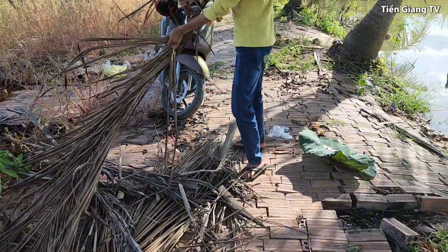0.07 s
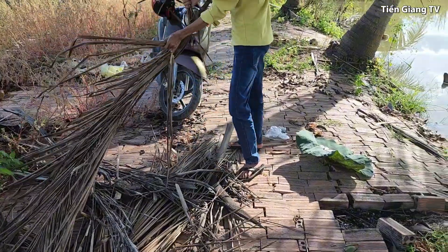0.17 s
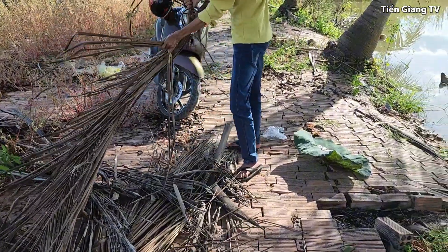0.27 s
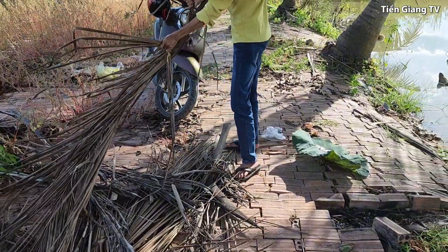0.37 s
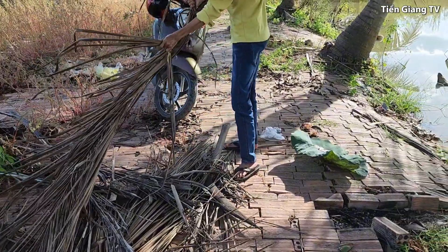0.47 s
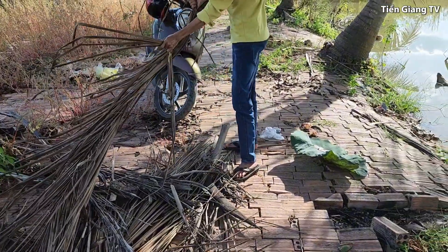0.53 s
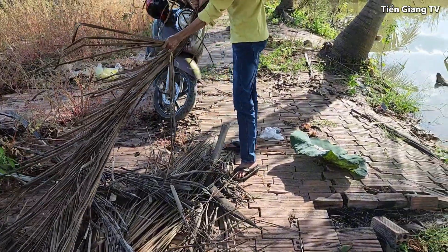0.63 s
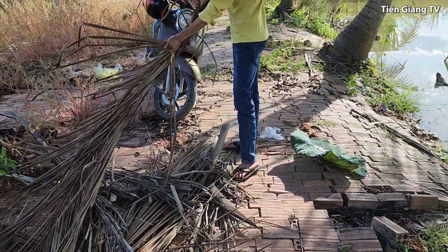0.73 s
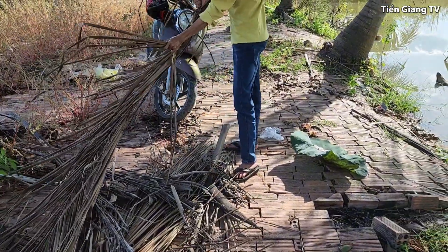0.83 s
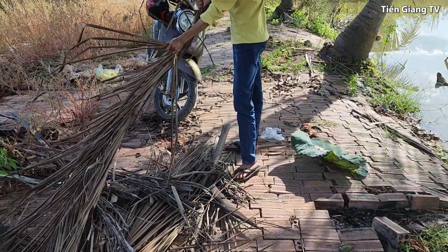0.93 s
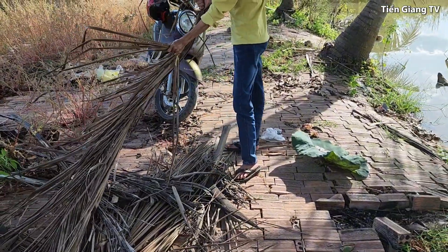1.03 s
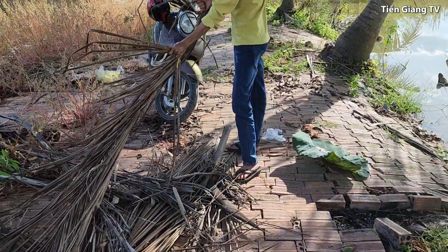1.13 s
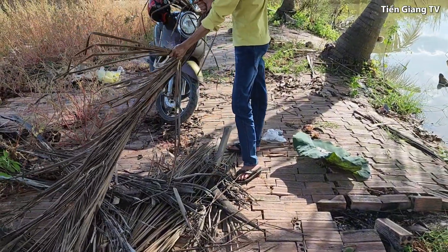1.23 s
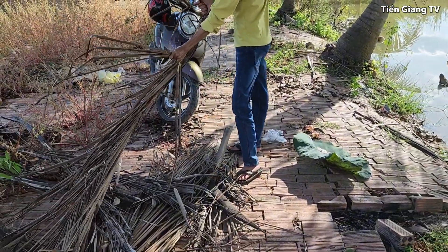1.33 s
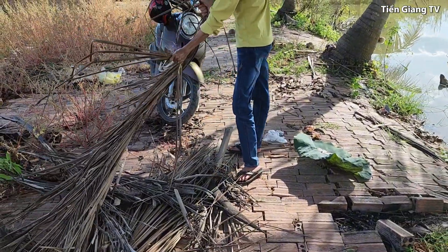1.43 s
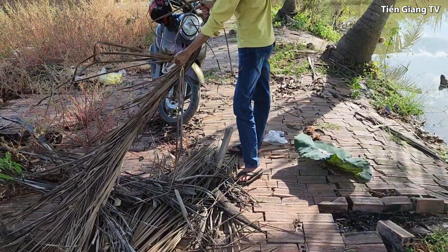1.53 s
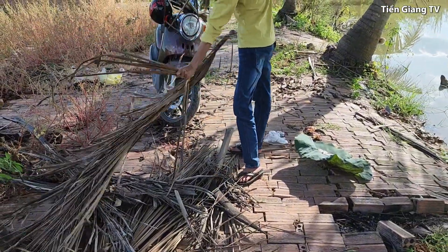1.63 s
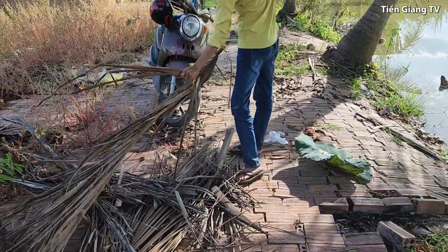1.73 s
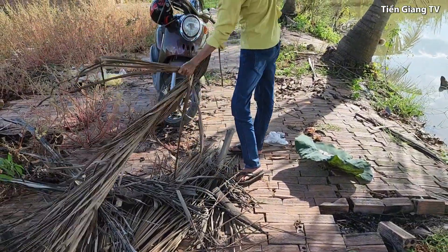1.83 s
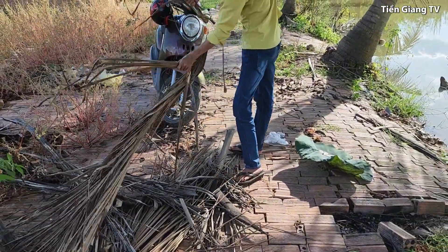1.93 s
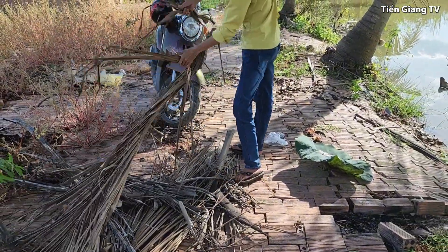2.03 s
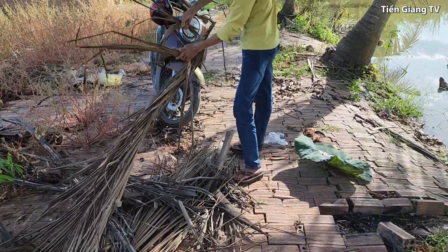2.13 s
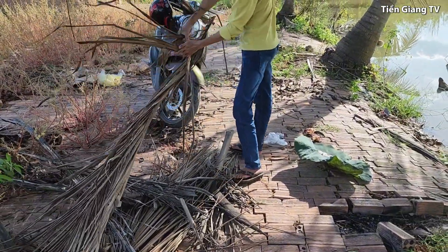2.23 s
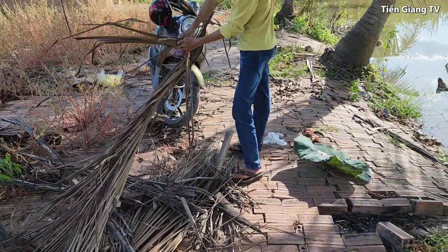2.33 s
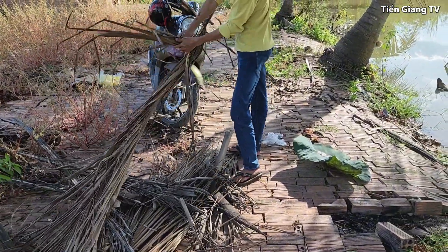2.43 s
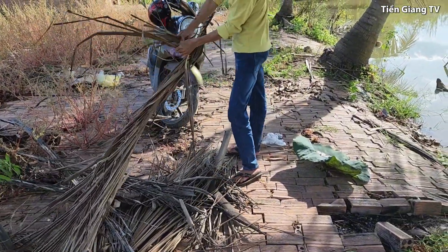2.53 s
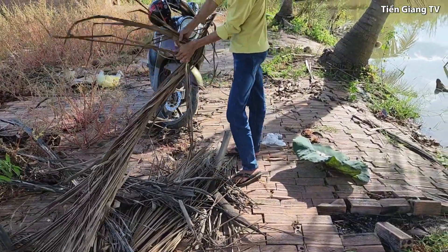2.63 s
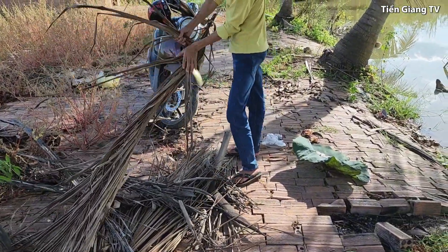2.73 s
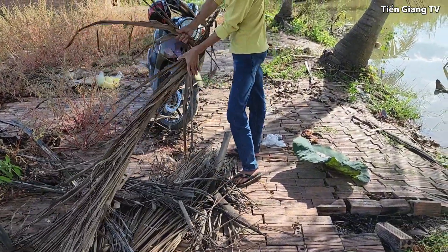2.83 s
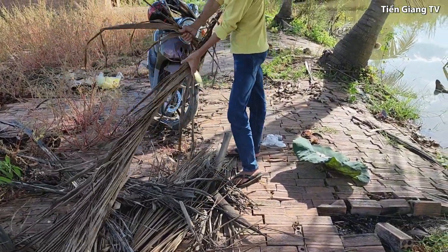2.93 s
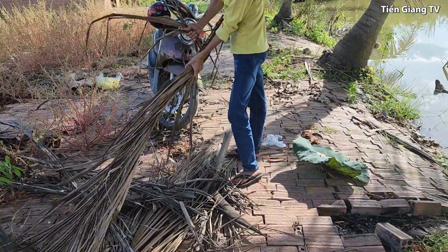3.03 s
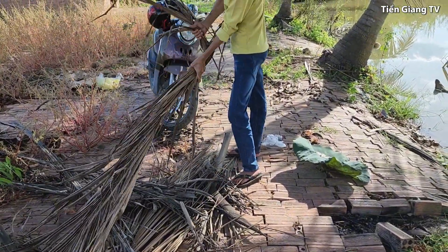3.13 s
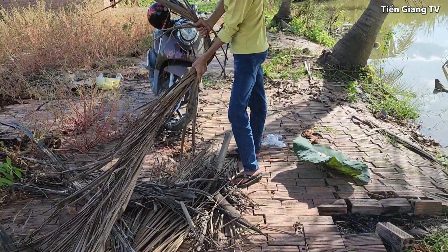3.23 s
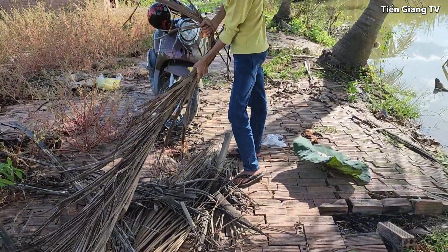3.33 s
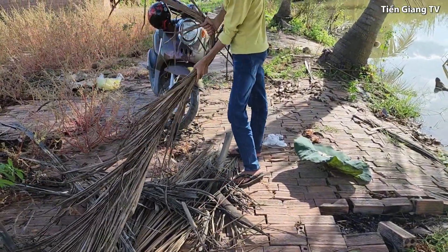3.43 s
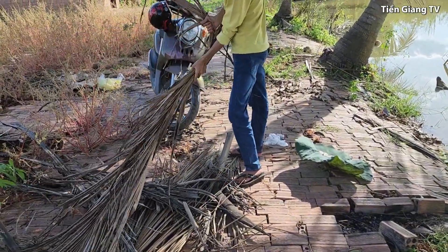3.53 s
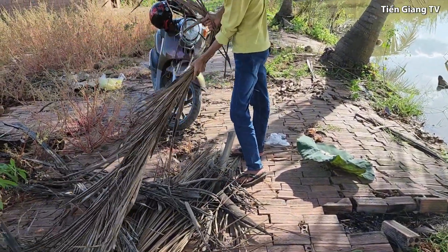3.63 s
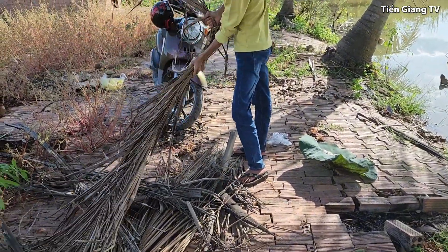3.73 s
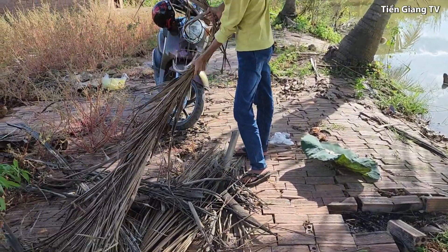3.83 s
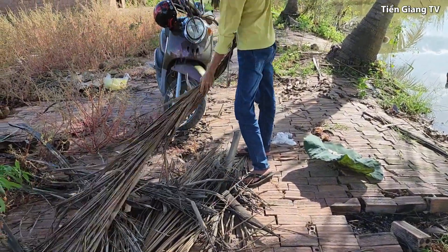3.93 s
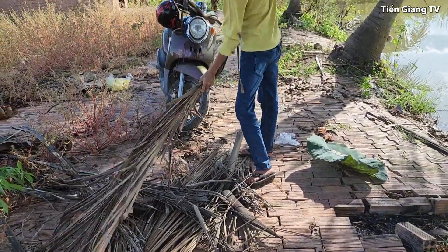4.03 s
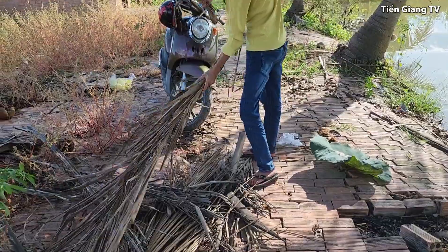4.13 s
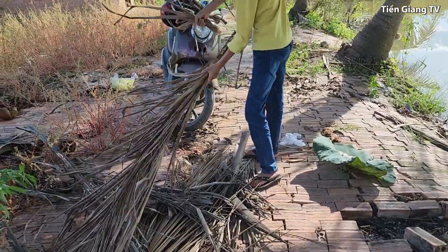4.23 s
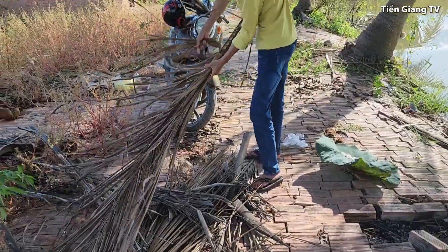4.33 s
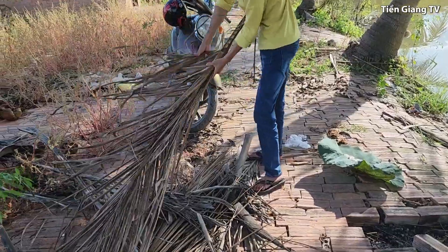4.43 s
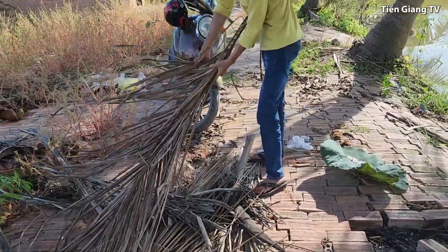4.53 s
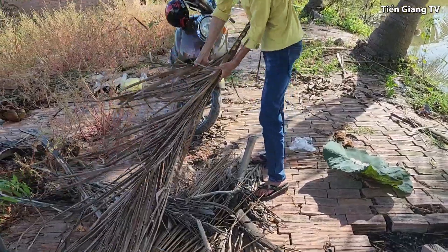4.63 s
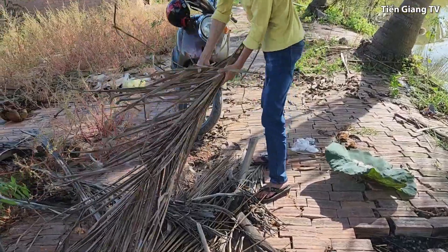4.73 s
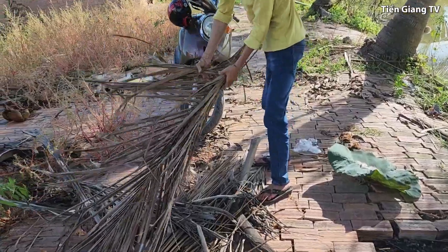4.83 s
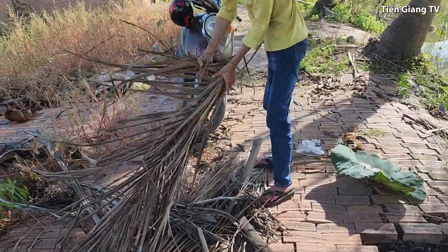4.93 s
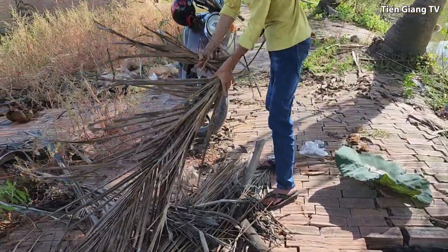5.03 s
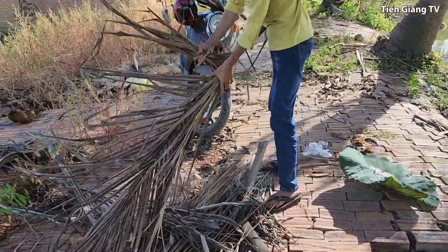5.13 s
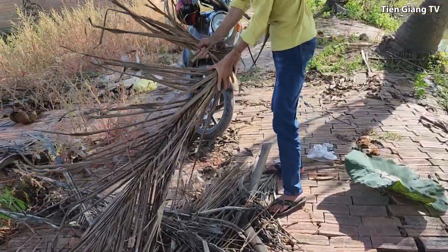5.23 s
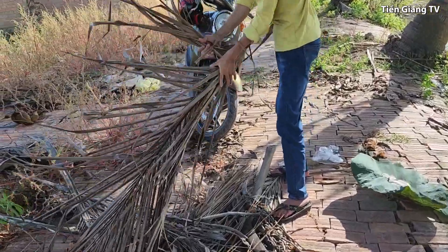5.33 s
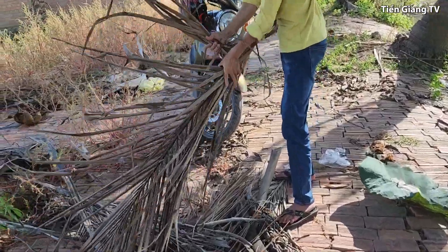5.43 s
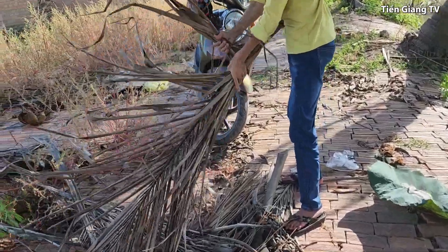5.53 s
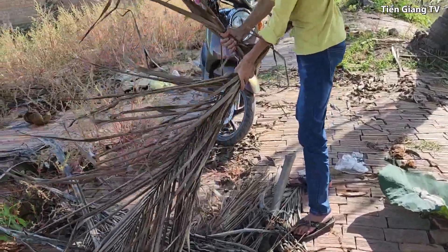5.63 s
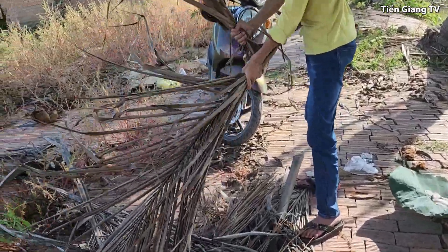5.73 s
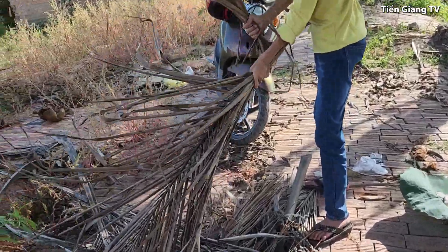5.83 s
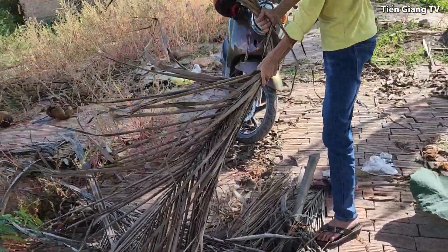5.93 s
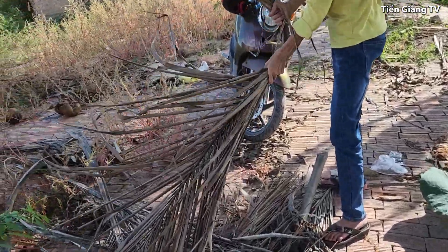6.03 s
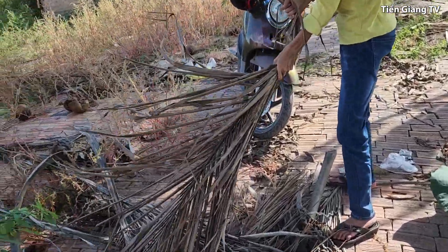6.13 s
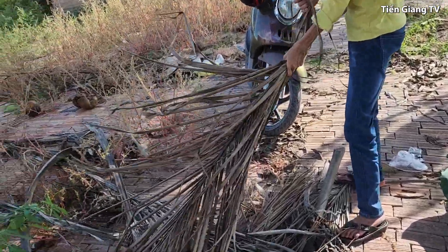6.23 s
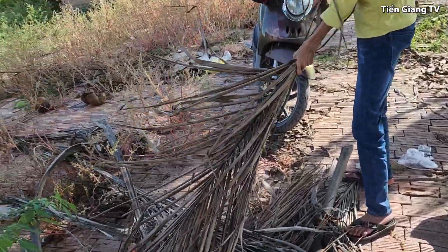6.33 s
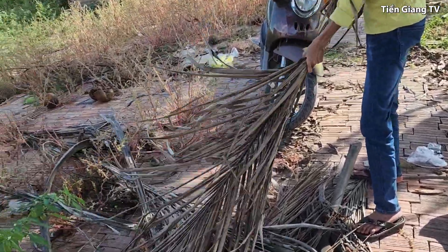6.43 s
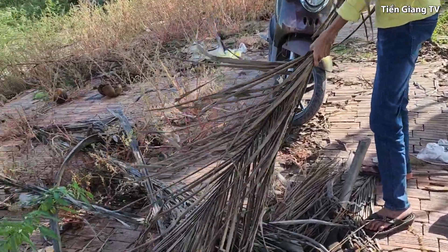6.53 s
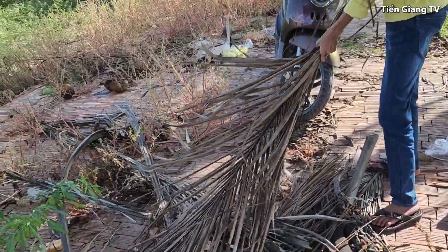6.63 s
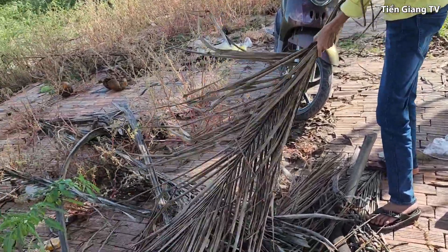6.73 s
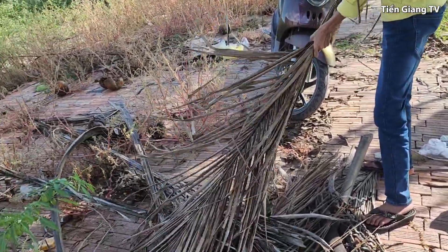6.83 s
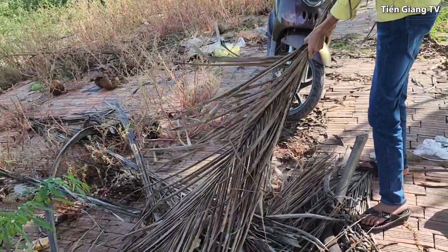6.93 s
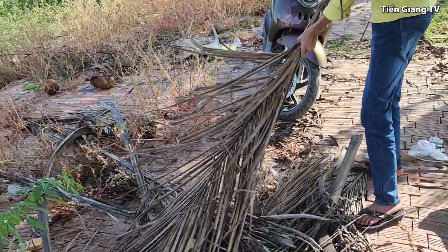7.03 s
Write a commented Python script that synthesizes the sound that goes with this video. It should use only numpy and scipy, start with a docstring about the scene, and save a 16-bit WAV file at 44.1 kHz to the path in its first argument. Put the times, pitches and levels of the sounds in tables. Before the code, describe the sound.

Dry palm fronds rustle and crackle in uneven pulls over a heap on brick, with snapping ribs, hollow taps and one hard late thud.

```python
"""A dry frond rustles and rib snaps crowd the first moments, over a low outdoor rumble and drone.
Fronds are pulled over a heap on a brick path: ringing noise ticks make the rustle, noise bursts the snaps.
Hollow stems tap and heavy stalks thud as damped sine modes; late on, a hard thud leaves the heap rattling.
Two microphones hear the fronds drift from left to right, with a short scattered tail."""
import sys
import numpy as np
from scipy import signal
from scipy.fft import rfft, irfft, next_fast_len
from scipy.io import wavfile
from scipy.ndimage import uniform_filter1d, map_coordinates

SR = 44100
rng = np.random.default_rng(int(sys.argv[2]) if len(sys.argv) > 2 else 0)


def dump(signal):
    """Clip the signal to [-1, 1] and save it as 16-bit WAV at the path in sys.argv[1]."""
    limited = np.clip(np.atleast_2d(signal).T, -1, 1)
    pcm = np.round(limited * 32767).astype(np.int16)
    wavfile.write(sys.argv[1], SR, pcm)


N = 312228  # samples


def amp(db):
    """Decibels to gain."""
    return 10 ** (np.asarray(db) / 20)


def unit(x):
    """Scale to rms 1."""
    return x / np.sqrt(np.mean(x ** 2) + 1e-20)


def along(points, hz):
    """Read (Hz, value) points on a log frequency axis."""
    point_hz, value = np.transpose(points)
    return np.interp(np.log(hz + 1), np.log(point_hz + 1), value)


def curves(rows):
    """One value per sample for each column after the time."""
    time_s, *columns = np.transpose(rows)
    return [np.interp(np.arange(N) / SR, time_s, column) for column in columns]


def wobble(knots_per_s):
    """Random curve: straight lines between normal random knots."""
    knots = rng.standard_normal(int(N * knots_per_s / SR) + 4)
    return np.interp(np.arange(N) * knots_per_s / SR, np.arange(len(knots)), knots)


def filtered(x, gain):
    """Apply a gain that depends on frequency."""
    n = x.shape[-1]
    padded = next_fast_len(n + SR // 20)
    spectrum = rfft(x, padded) * gain(np.fft.rfftfreq(padded, 1 / SR))
    return irfft(spectrum, padded)[..., :n]


def below(hz, edge_hz):
    """Smooth low-pass gain; 1 minus it is the matching high-pass."""
    return 1 / (1 + (hz / edge_hz) ** 4)


def add(track, start_s, sound):
    """Mix a sound into a track."""
    part = track[..., max(round(start_s * SR), 0):][..., :sound.shape[-1]]
    part += sound[..., :part.shape[-1]]


def pair(size, apart):
    """Stereo noise; apart is the share of power the two channels do not have in common."""
    apart = np.clip(apart, 0, 1)
    common = np.sqrt(1 - apart) * rng.standard_normal(size)
    return common + np.sqrt(apart) * rng.standard_normal((2, size))


# Restless held frond. Each row: time in s, leaflet rustle in dB, brightness in dB (tips up, stalk down by half).
STIR = [(0, -42.5, 0), (.25, -44, 6), (.6, -56.5, 1), (.8, -63, 9.5), (1.05, -57, 0), (1.3, -52, 2),
        (1.57, -53, -2), (2.3, -52.5, -2), (2.76, -54.5, -1.5), (3.15, -44, 1), (3.6, -45.5, 0),
        (3.8, -44.5, 0.5), (4.3, -46, -1), (4.7, -43, -6), (5.0, -42.5, -2), (5.15, -46, -0.5),
        (6.1, -43.5, 3.5), (6.3, -49, 1), (7.08, -43, -1)]
STIR_STALK_DB, STIR_TIP_DB = -8.5, -1  # over its leaflet rustle
STIR_CRACKLE = 0.3  # share of power, 0-1
# Pulls on the fronds. Each row: start in s, rise in s, hold in s, die-away t60 in s, leaflet rustle in dB,
# stalk scrape over it in dB, tip fizz over it in dB, crackle share 0-1 (sliding low, bending and tugging high).
PULLS = [(0.05, 0.084, 0.069, 0.18, -36, -22, 0.5, 0.66), (0.3, 0.042, 0.049, 0.32, -43, -11, 4, 0.52),
         (0.535, 0.026, 0.018, 0.61, -51.5, -24, 5, 0.47), (0.655, .04, .04, 0.22, -50.5, -12.5, 1, .45),
         (0.844, 0.013, 0.095, 0.37, -55, -13.5, 4.5, .7), (1.045, 0.03, .02, 0.23, -51.5, -13, 0.5, 0.45),
         (1.583, 0.052, 0.037, 2.3, -34, -8.5, -2.5, 0.05), (2.505, 0.071, .06, 0.24, -47, -14, -2, .45),
         (2.847, 0.084, 0.13, 0.54, -45.5, -8, -6, 0.3), (3.217, .07, 0.17, .6, -36.5, -17.5, -3.5, 0.49),
         (3.833, 0.063, 0.096, 0.88, -32.5, -8.5, -3.5, 0.05),
         (4.407, 0.058, 0.02, 1, -43.5, -6.5, -2, 0.2), (4.781, .045, 0.037, 0.33, -29.5, -9, -5.5, .25),
         (5.175, .06, .015, 0.51, -39.5, -9.5, 0.5, 0.6), (5.321, 0.073, 0.28, 0.64, -39, -10, -8, 0.52),
         (5.55, .075, 0.046, 1.05, -29, -10.5, -5.5, 0.4), (5.759, 0.035, .08, 0.54, -38, -25, -2.5, 0.29),
         (5.912, 0.042, 0.1, .18, -35.5, -10.5, 1, 0.63), (6.14, .012, 0.0084, 0.19, -43, -6, 10, .5),
         (6.239, .008, .015, .25, -42, -10, 3, 0.35), (6.326, 0.047, 0.014, 0.13, -32, -2.5, 5.5, 0.43),
         (6.392, 0.045, .1, 1.3, -40.5, -4, -2, .1), (6.579, 0.012, 0.021, .6, -32, -6.5, -3, 0.06),
         (6.712, 0.034, 0.054, 0.49, -35.5, -4, -3, 0.14), (6.86, 0.078, 0.11, 0.68, -34.5, -9.5, -6, 0.04)]


def effort():
    """Stalk, blade and tip drive and crackle share: each pull rises, holds and dies away over the stir."""
    t = np.arange(N) / SR
    stir_db, bright_db = curves(STIR)
    stalk_stir_db = stir_db + STIR_STALK_DB - bright_db / 2
    tip_stir_db = stir_db + STIR_TIP_DB + bright_db
    power = amp([stalk_stir_db, stir_db, tip_stir_db]) ** 2
    crackling = STIR_CRACKLE * power[1]
    for start_s, rise_s, hold_s, t60_s, db, stalk_db, tip_db, share in PULLS:
        onset = np.clip((t - start_s) / rise_s, 0, 1)
        fading_s = np.maximum(t - start_s - rise_s - hold_s, 0)
        pull = (onset * amp(db - 60 * fading_s / t60_s)) ** 2
        power = power + np.outer(amp([stalk_db, 0, tip_db]) ** 2, pull)
        crackling = crackling + share * pull
    return (*np.sqrt(power), np.clip(crackling / power[1], 0, 1))


def leaflets(ticks_per_s, scatter_db, spurt_db, t60_s, ring_hz, ring_spread, count):
    """Groups of leaflets, each with its own brief ring, tick in spurts as they catch and slip."""
    out, t = np.zeros((2, N)), np.arange(SR // 100) / SR
    loudest_db = 1.25 * np.hypot(scatter_db, spurt_db)  # ticks are capped: none stands far above the rustle
    for place in np.linspace(-1, 1, count):
        size_db = scatter_db * rng.standard_normal(N) + spurt_db * wobble(30)
        slipping = rng.random(N) < ticks_per_s / count / SR
        slips = slipping * amp(np.minimum(size_db, loudest_db))
        energy = np.abs(signal.oaconvolve(slips ** 2, amp(-60 * t / t60_s) ** 2)[:N])
        group_hz = min(ring_hz * np.exp(ring_spread * place), SR * .45)
        ring = signal.iirpeak(group_hz, 2.5, SR)
        grains = pair(N, apart=0.83) * np.sqrt(energy)
        out += 0.67 * grains + signal.lfilter(*ring, grains)
    power = np.abs(uniform_filter1d(np.mean(out ** 2, axis=0), size=SR // 10))  # evened over 0.1 s
    return out / np.sqrt(power + 1e-9)


# Dry leaf spectrum, also colours the snaps. Each row: frequency in Hz, density in dB per Hz.
LEAF_SPECTRUM = [(180, -17.5), (330, -13), (520, -18), (750, -6), (1100, -10.5), (1380, -3.5), (1800, -3),
                 (2250, 1.5), (4300, 3), (6300, 0.5), (8200, -3.5), (11000, -2.5), (15500, -5),
                 (16000, -39)]


def rustle(stalk, blade, tip, share):
    """Dense sliding ticks and sparse crackles sound through stalks, blades and thin tips."""
    slide = leaflets(ticks_per_s=6000, scatter_db=4.5, spurt_db=2.5, t60_s=.004,
                     ring_hz=4000, ring_spread=1.3, count=6)
    crackle = leaflets(ticks_per_s=340, scatter_db=6, spurt_db=3.5, t60_s=.009,
                       ring_hz=4000, ring_spread=1.2, count=8)
    ticks = np.sqrt(1 - share) * slide + np.sqrt(share) * crackle
    leaf = lambda hz: amp(along(LEAF_SPECTRUM, hz))
    low = lambda hz: below(hz, 1670)
    high = lambda hz: 1 - below(hz, 7550)
    stalks = unit(filtered(ticks, lambda hz: leaf(hz) * low(hz)))
    blades = unit(filtered(ticks, lambda hz: leaf(hz) * (1 - low(hz) - high(hz))))
    tips = unit(filtered(ticks, lambda hz: leaf(hz) * high(hz)))
    return amp(1.86) * stalk * stalks + amp(-1.93) * blade * blades + tip * tips


# Drone swell. Each row: time in s, level in dB.
DRONE_LEVEL = [(0.0, -53), (0.12, -58), (1.48, -57), (1.99, -46), (2.06, -48), (3.17, -53.5), (4.42, -49.5),
               (5.79, -60.5), (6.5, -59.5)]
# Rumble spectrum. Each row: frequency in Hz, density in dB per Hz.
RUMBLE_SPECTRUM = [(20, -13), (32, -27), (45, -2), (59, 4), (72, -1.5), (105, -2), (140, -6), (220, -54),
                   (400, -55)]
# Drone spectrum. Each row: frequency in Hz, density in dB per Hz.
DRONE_SPECTRUM = [(60, -33), (110, -3.5), (150, 3.5), (220, 1), (300, -14), (410, -12), (520, -29),
                  (1200, -22), (4000, -45)]
RUMBLE_DB = -54.5


def outdoors():
    """Shaped noise: a steady deep rumble and a low drone that swells, as of far traffic."""
    drone_db, = curves(DRONE_LEVEL)
    rumble = unit(filtered(pair(N, apart=0.019), lambda hz: amp(along(RUMBLE_SPECTRUM, hz))))
    drone = unit(filtered(pair(N, apart=0.14), lambda hz: amp(along(DRONE_SPECTRUM, hz))))
    return amp(RUMBLE_DB) * rumble + amp(drone_db) * drone


STRAY_PER_S = 30  # in pure crackle
STRAY_DB, STRAY_SCATTER_DB = 17.5, 2  # level over the leaflet drive, spread
STRAY_WOODY_DB, STRAY_WOODY_SCATTER_DB = -20, 7


def stray_snaps(blade, share, count):
    """Small ribs give way at random, more often the more the frond crackles, louder the harder the pull."""
    at, chance = rng.random((count, 2)).T
    size, wood = rng.standard_normal((count, 2)).T
    i = (at * N).astype(int)
    level_db = 20 * np.log10(blade[i]) + STRAY_DB + STRAY_SCATTER_DB * size
    woody_db = STRAY_WOODY_DB + STRAY_WOODY_SCATTER_DB * wood
    rows = np.transpose([i / SR, level_db, woody_db])
    return list(rows[chance < STRAY_PER_S * share[i] * N / SR / count])


# Loudest ribs snapping and slapping. Each row: time in s, relative level in dB,
# woodiness in dB (-17 is plain leaf, more lifts the lows).
SNAPS = [(0.0861, -16.5, -21), (0.1173, -20, 4), (0.13, -11.5, -17), (0.1524, -17, -19), (0.183, -11, -32),
         (0.196, -20, -17), (0.223, -17, -14), (0.2467, -19, -50), (0.263, -13.5, -35.5),
         (0.3714, -25, -17), (0.5654, -29, -28), (0.845, -24, -6.5), (0.8594, -29, -18), (1.0957, -25, -50),
         (1.1815, -29.5, -25), (1.3991, -25, -6), (1.5865, -18.5, -16), (2.5697, -23.5, -12),
         (2.6316, -17.5, -34), (2.7537, -22, -27), (3.1143, -19, -26), (3.1452, -19.5, -17),
         (3.2912, -21, -11), (3.3272, -11, -14), (3.3518, -19, -4), (3.3814, -21, -19), (3.447, -19.5, -18),
         (3.5037, -18, -7), (3.8331, -19, -38), (3.868, -24, -5), (4.0162, -18, -13), (4.797, -13.5, -19),
         (4.8275, -10.5, -18), (4.8315, -8, -9), (4.8787, -22, -9), (5.0192, -17, -26),
         (5.1584, -19, -20.5), (5.2443, -16, -19), (5.344, -10.5, -14.5), (5.401, -14, -6),
         (5.465, -16.5, 3), (5.4724, -16, -23), (5.7779, -11.5, -18), (5.9208, -17.5, -19),
         (5.9509, -11, -4.5), (5.9821, -18.5, -17), (6.0341, -10.5, -12), (6.1493, -11.5, -16),
         (6.2422, -16, -20), (6.3335, -11.5, -21), (6.3545, -21, 0), (6.3733, -6, -18), (6.5865, -15, -24)]
SHIVER_DB = -21  # leaflets shivering after a snap, under its crack


def snaps(ribs):
    """A rib lets go with a crack, the bricks return it a few ms later, and the leaflets shiver on."""
    out, t = np.zeros((2, N)), np.arange(SR // 8) / SR
    burst = amp(-60 * t / .004) + .35 * amp(-60 * t / .014)
    thin = lambda hz: 1 - below(hz, 720)  # a narrow rib radiates little bass
    for time_s, db, woody_db in ribs:
        echo_s = np.maximum(t - rng.uniform(0.00094, 0.0094), 0)
        bricks = amp(-15 - 60 * echo_s / .014) * (echo_s > 0)
        after = bricks + amp(SHIVER_DB - 60 * t / .11)
        crack = pair(len(t), apart=0.3) * burst + pair(len(t), apart=0.35) * after
        wood_db = lambda hz: 1.08 * (woody_db + 17) * below(hz, 2900)
        crack = filtered(crack, lambda hz: thin(hz) * amp(along(LEAF_SPECTRUM, hz) + wood_db(hz)))
        add(out, time_s + 0.001218, amp(db + 2) * crack / np.abs(crack).max())
    return out


def struck(blows, modes, contact_s, fray_hz):
    """Each blow rings a few damped modes at its own pitch; loose dry fibres blur them over fray_hz."""
    out, t = np.zeros(N), np.arange(SR // 8) / SR
    for start_s, db, pitch_hz in blows:
        steps = rng.standard_normal((len(modes), len(t)))
        drift = np.cumsum(steps, axis=1) * np.sqrt(2 * np.pi * abs(fray_hz) / SR)  # phase, radians
        ring = np.zeros(len(t))
        for (ratio, mode_db, t60_s), blur in zip(modes, drift):
            ring += amp(mode_db - 60 * t / t60_s) * np.sin(2 * np.pi * pitch_hz * ratio * t + blur)
        ring = ring * (1 - np.exp(-t / contact_s))  # a longer contact softens the start
        add(out, start_s, amp(db) * ring / np.abs(ring).max())
    return out


# Heavy stalks landing on the heap. Each row: start in s, level in dB, reference pitch in Hz.
THUDS = [(.118, -44, 341.2), (.438, -39, 173), (.441, -44, 710), (2.922, -39.5, 734), (5.953, -36.5, 301),
         (6.374, -41, 445), (6.742, -27, 445), (6.75, -10.5, 476), (6.773, -24, 1005), (6.777, -24.5, 375),
         (6.793, -23, 590), (6.795, -23, 1090), (6.800, -25.5, 300), (6.817, -28, 730), (6.864, -31, 372.5)]
# Stalk modes. Each row: ratio to the reference pitch, relative level in dB, t60 in s.
STALK_MODES = [(1.02, 0.5, 0.014), (0.6, -19.5, 0.028), (2.33, -10, 0.013)]


def thuds():
    """Dull blows: soft contact, nearly pure damped modes."""
    return struck(THUDS, STALK_MODES, contact_s=0.0024, fray_hz=2.2)


# Hollow stems tapping each other. Each row: start in s, level in dB, reference pitch in Hz.
TAPS = [(.847, -40, 1334), (.938, -34, 2190), (1.400, -30.5, 5400), (3.015, -29, 2190),
        (3.115, -27.5, 2860), (3.215, -28.5, 2320), (3.243, -32, 2590), (3.304, -28, 2550),
        (3.329, -18.5, 3010), (3.504, -27, 2104), (3.684, -27, 2120), (4.734, -22, 2173),
        (4.829, -16.5, 1520), (4.991, -23, 2370), (5.400, -18, 2710), (5.466, -26, 1960)]
# Stem modes. Each row: ratio to the reference pitch, relative level in dB, t60 in s.
STEM_MODES = [(1.035, -2, 0.029), (0.635, -7.5, 0.0091), (1.61, -9, 0.018)]


def taps():
    """Hollow taps: short contact, modes blurred by frayed fibres."""
    return struck(TAPS, STEM_MODES, contact_s=0.00064, fray_hz=171)


# Settling heap spectrum. Each row: frequency in Hz, density in dB per Hz.
HEAP_SPECTRUM = [(40, -30), (80, 5), (300, 1), (580, 7), (800, -3), (1100, -3), (1400, -13), (2200, -45)]


def heap():
    """The hardest blow leaves the heap rattling dully: decaying low noise."""
    out, t = np.zeros((2, N)), np.arange(SR // 4) / SR
    settle = unit(filtered(pair(len(t), apart=0.057), lambda hz: amp(along(HEAP_SPECTRUM, hz))))
    add(out, 6.758, settle * amp(-31.0 - 60 * t / 0.43) * (1 - np.exp(-t / 0.0057)))
    return out


# Place of the fronds, drifting left to right. Each row: time in s, lead of the left microphone in ms.
PLACE = [(.3, 0.094), (1.1, .2), (2.0, 0.19), (2.5, 0.11), (3.4, 0.049), (3.9, .17), (4.7, .04),
         (5.8, 0.027), (6.4, -0.12)]
LOUDER_DB_PER_MS = 5  # the earlier microphone is also the louder one


def placed(x):
    """The nearer microphone hears the fronds earlier and louder; long waves reach both more alike."""
    x = x - filtered(x - x.mean(axis=0), lambda hz: 0.67 * below(hz, 2200))
    lead_ms, = curves(PLACE)
    side_db = LOUDER_DB_PER_MS * lead_ms
    lead_samples = lead_ms * SR / 1000
    ears = []
    for ear, side in zip(x, (1, -1)):
        shifted = map_coordinates(ear, [np.arange(N) + side * lead_samples / 2], order=5)
        ears.append(amp(side * side_db / 2) * shifted)
    return np.array(ears)


# Decay of the outdoor tail. Each row: frequency in Hz, t60 in s.
YARD_DECAY = [(200, 0.28), (2000, 0.14), (8000, 0.38), (16000, 0.062)]


def yard(x):
    """Ground, trunks and brush scatter a short tail: convolution with decaying noise."""
    hz, t, z = signal.stft(rng.standard_normal((2, SR // 3)), SR, nperseg=256)
    decay = amp(-60 * t / along(YARD_DECAY, hz)[:, None])
    tail = signal.istft(z * decay, SR, nperseg=256)[1]
    return signal.fftconvolve(x, tail / np.linalg.norm(tail[0]), axes=1)[:, :N]


def scene():
    """Rustle, snaps, taps and thuds in the open air; the brush scatters little bass."""
    stalk, blade, tip, share = effort()
    ribs = list(SNAPS) + stray_snaps(blade, share, count=300)
    fronds = rustle(stalk, blade, tip, share) + snaps(ribs) + thuds() + taps() + heap()
    fronds = placed(fronds)
    scatter = filtered(yard(fronds), lambda hz: 1 - below(hz, 430))
    return fronds + amp(-11) * scatter + outdoors()


# Brighter right microphone. Each row: frequency in Hz, right over left in dB.
RIGHT_OVER_LEFT = [(6500, 0.77), (9000, 4.5), (12500, 0)]
TOP_HZ = 16000


def record(dry):
    """The two microphones differ mostly in the treble; nothing is kept from the band limit up."""
    sides = np.array([[-1], [1]])
    return filtered(dry, lambda hz: amp(along(RIGHT_OVER_LEFT, hz) * sides / 2) * (hz < TOP_HZ))


dry = scene()
out = record(dry)
dump(out)
```